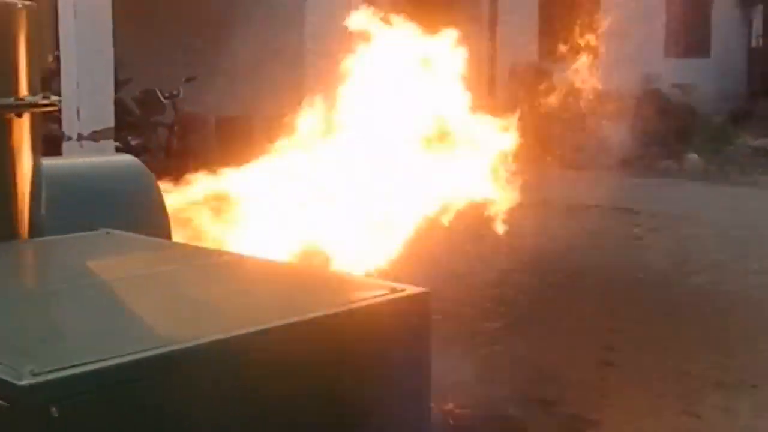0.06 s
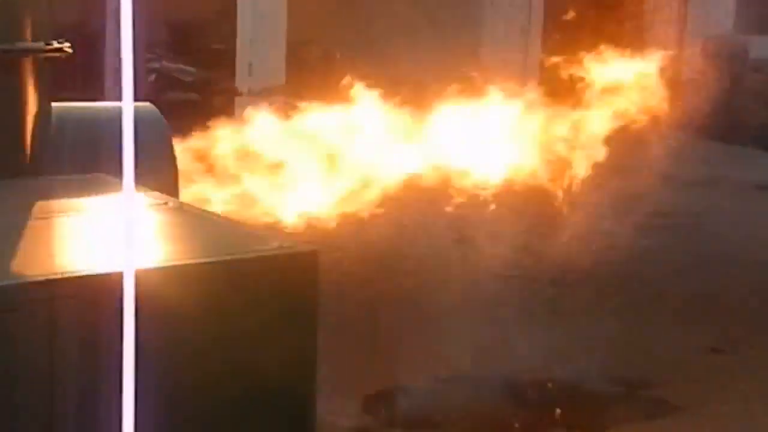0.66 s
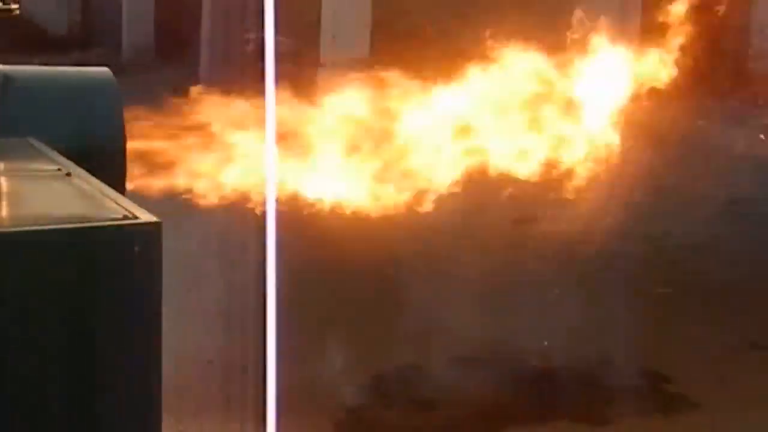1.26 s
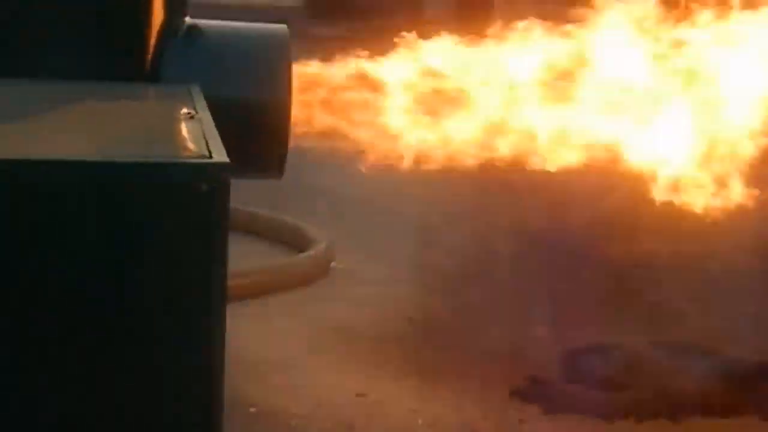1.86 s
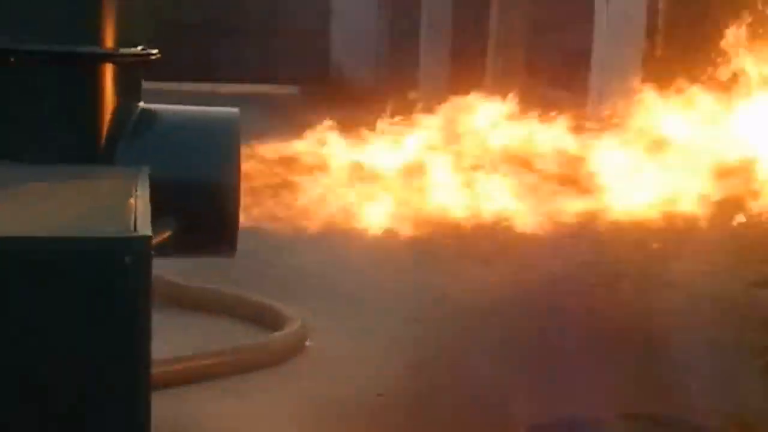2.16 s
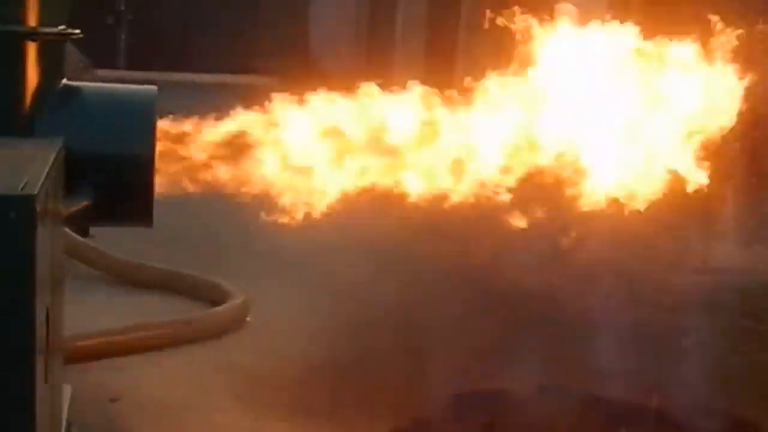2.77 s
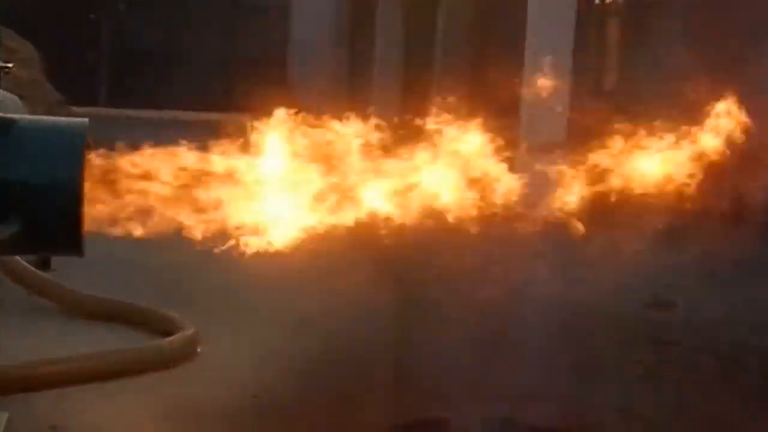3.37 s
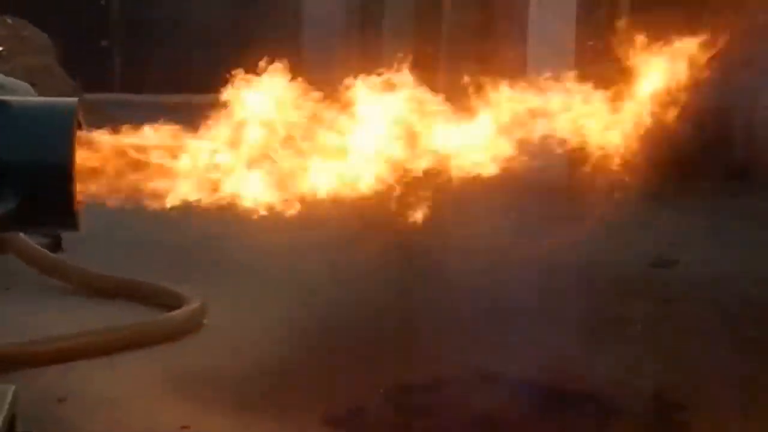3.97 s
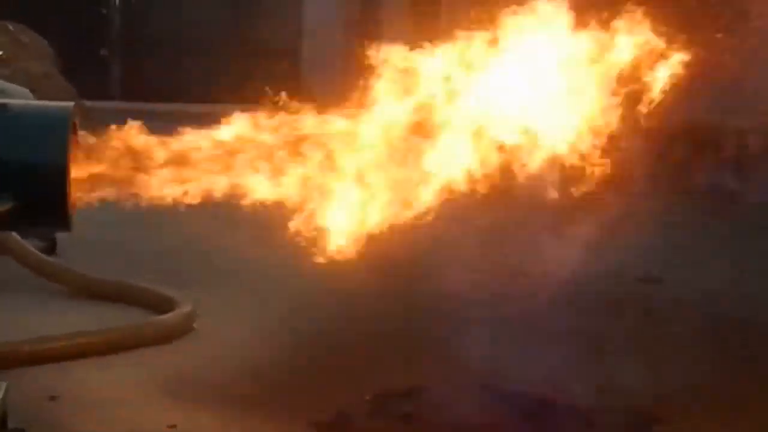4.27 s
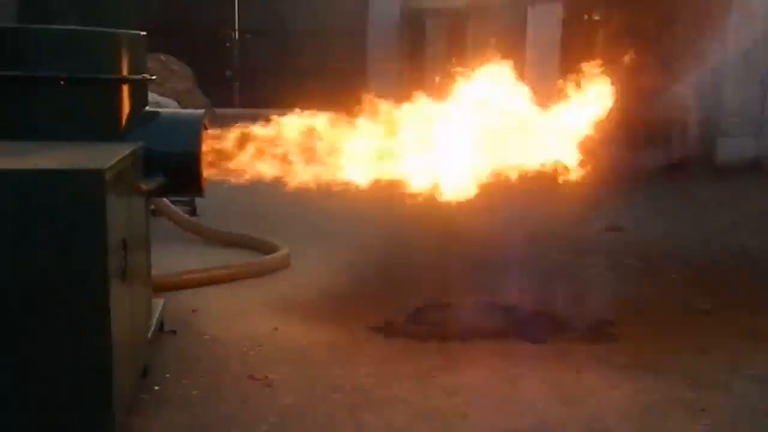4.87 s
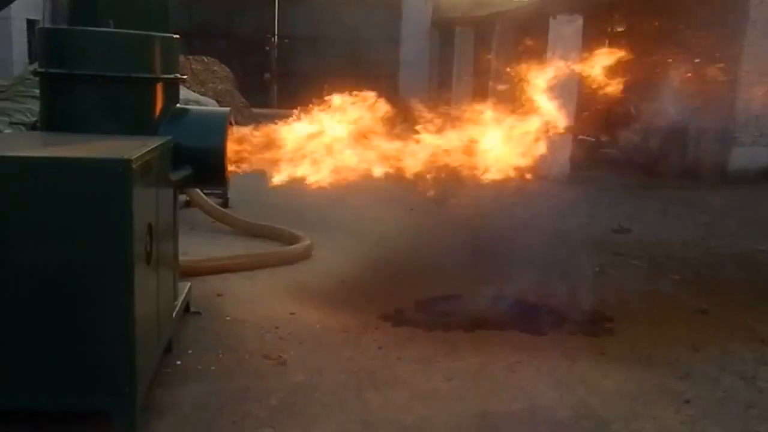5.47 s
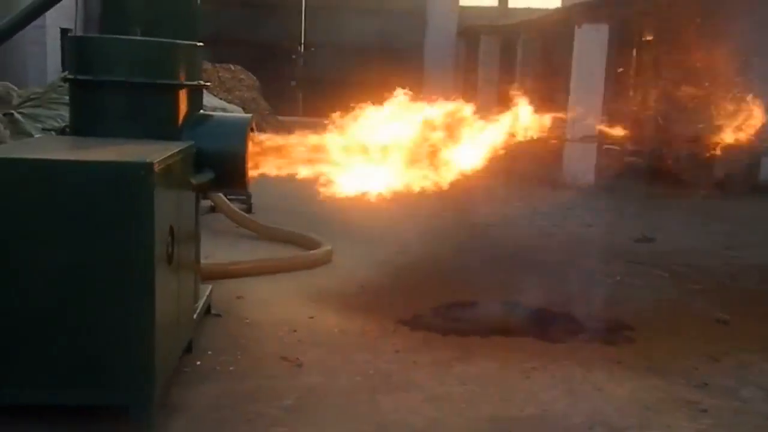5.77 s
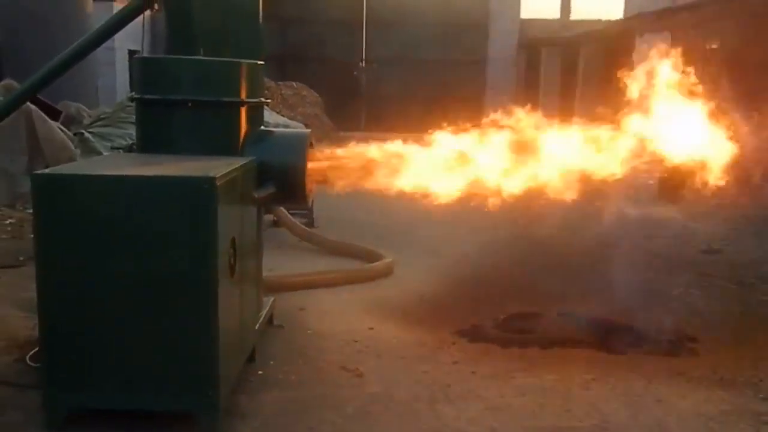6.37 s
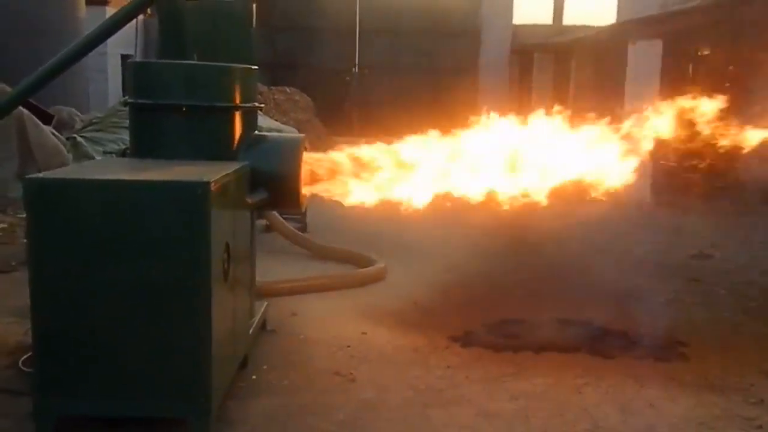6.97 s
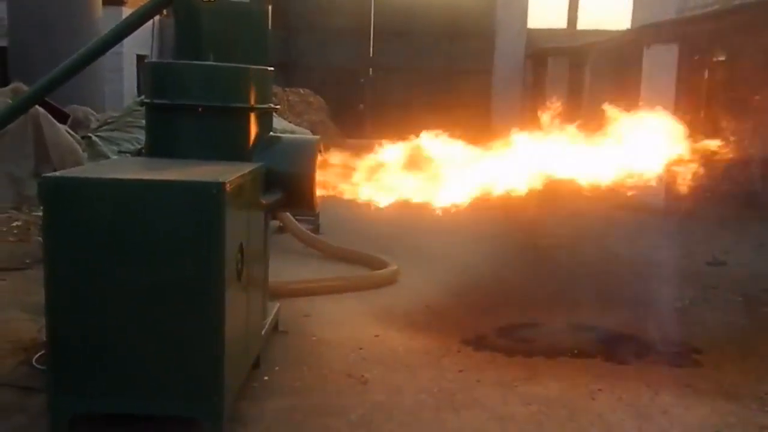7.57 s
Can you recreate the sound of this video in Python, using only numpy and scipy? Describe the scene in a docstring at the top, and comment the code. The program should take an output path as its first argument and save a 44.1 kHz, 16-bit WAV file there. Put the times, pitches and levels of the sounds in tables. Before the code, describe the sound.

Deep turbulent flame roar from a blown burner, flaring and thumping over a fan's hum, with a short muffled spell and sharp clicks.

```python
"""A large blown burner throws a flame across a workshop yard: deep rumble, turbulent roar, hiss, blower hum.
From the first second it spits, flares and thumps; loud thumps duck the camera's gain, which creeps back.
The camera walks round the burner, so the comb filter of the ground reflection slides upward.
At 4.5 s a finger knocks the microphone and covers it, muffling the burner until it slips off at 5.3 s.
Then the camera backs away: the hiss fades, and sharp overload clicks mark many of the thumps."""
import sys
import numpy as np
from scipy.fft import rfft, irfft, next_fast_len
from scipy.io import wavfile
from scipy.ndimage import uniform_filter1d, minimum_filter1d, map_coordinates

SR = 44100
rng = np.random.default_rng(int(sys.argv[2]) if len(sys.argv) > 2 else 0)


def to_wav(s):
    """Save 16-bit WAV."""
    ch = np.atleast_2d(s).T  # columns
    pcm = np.round(np.clip(ch, -1, 1) * 32767)  # PCM
    wavfile.write(sys.argv[1], SR, pcm.astype(np.int16))


N = 336042


# strength of the fire: t/s, rumble gain/dB, roar gain/dB
FIRE_STRENGTH = [(.35, 1, -2.7), (.6, 2.3, 0.2), (.85, 2.7, -0.7), (1.03, -3.2, -2.8), (1.3, 1, 0.3),
                 (1.48, 0.8, 2), (1.7, 2, 2), (2.7, -0.5, 1), (3.15, 1, 1.2), (3.6, 0.7, 1), (4.4, 1, 2.7),
                 (5.4, -1, -1.7), (6.7, 0, -3.1), (7.6, 2.8, -2.4)]
def flame():
    """Turbulent combustion: the same random puffs modulate the drone, the roar and the air jet."""
    rumble_db, fire_db = curves(FIRE_STRENGTH)
    lag_ms, far, beside = camera_path()
    puffs, sizzle = wobble(rate=70), wobble(rate=870)
    flare_db, thumps = flares()
    surge_db = surges()
    drone_db = 0.588 * fire_db + 0.96 * flare_db + 0.75 * surge_db - 2.56 * far
    roar_db = fire_db + 0.85 * flare_db + surge_db
    fire = thumps + plume_rumble(far, lag_ms) * amp(rumble_db - 10)
    fire += tube_drone(puffs, far, lag_ms) * amp(drone_db - 12.9)
    fire += eddy_roar(puffs, beside, lag_ms) * amp(roar_db - 20.5)
    return fire + air_jet(puffs, sizzle, 0.5 * (flare_db + surge_db), lag_ms)


# rumble spectra, near and far: f/Hz, level/dB
PLUME_NEAR = [(12, -7), (25, -5), (67, 4.5), (105, -3), (160, -1.8), (205, -7.5), (300, -20), (600, -79)]
PLUME_FAR = [(12, -5.5), (25, -4.5), (60, 0.5), (100, 1.5), (155, -1.5), (205, -2.5), (300, -21.5),
             (600, -81)]
def plume_rumble(far, lag_ms):
    """Unsteady heat release: the whole plume radiates low noise, its swing softly limited."""
    plume = over_ground(blend(PLUME_NEAR, PLUME_FAR, far ** 2), lag_ms, bounce=0.341)
    return unit(np.tanh(plume / 2.1))


# drone spectra, near and far: f/Hz, level/dB
TUBE_NEAR = [(150, -5), (240, 3), (305, 6.3), (405, 4.8), (520, -6.5), (800, -48.5)]
TUBE_FAR = [(150, -13), (205, 4.5), (280, 5.3), (420, 8.5), (530, 0), (680, -1.5), (900, -38.5)]
def tube_drone(puffs, far, lag_ms):
    """Air-column resonance: the burner tube drones, higher in pitch towards the far side."""
    return over_ground(blend(TUBE_NEAR, TUBE_FAR, far) * amp(1.12 * puffs), lag_ms, bounce=0.33)


# roar spectra, behind the burner and beside the flame: f/Hz, level/dB
EDDIES_BEHIND = [(300, -15), (620, 5.5), (780, 3), (1100, -3.5), (1450, -9), (1900, -11.5), (3500, -28.5),
                 (6000, -48.5)]
EDDIES_BESIDE = [(300, -16), (600, 0.5), (850, 1.5), (1150, -2.5), (1900, -5.5), (2400, -18), (3500, -20),
                 (6000, -47.5)]
def eddy_roar(puffs, beside, lag_ms):
    """Directivity: burning eddies sound brighter from the side than from behind."""
    eddies = blend(EDDIES_BEHIND, EDDIES_BESIDE, beside) * amp(0.834 * puffs)
    return over_ground(eddies, lag_ms, bounce=0.25)


# ends of flares: t/s, thump level/dB, swell/dB
FLARE_ENDS = [(0.446, 3, 4), (.648, 9, -1), (.975, 4.5, 4), (1.131, 5, 1.5), (1.572, 9, 1.5), (1.97, 4, 2),
              (2.302, 4.5, 3.5), (2.545, 3.5, 2), (2.705, 6.5, -0.5), (2.985, 4.5, 5), (3.128, 8, 3),
              (3.463, 7, 5), (3.937, 4.5, 3), (4.391, 6.5, -2), (5.41, 5, 1), (5.61, 2, 1),
              (5.81, 6.5, -0.5), (6.131, 4.5, 5.5), (6.308, 4, 3), (6.742, 5.5, 4), (6.992, 7, 2.5),
              (7.365, 7, 3), (7.564, 10.5, -3.5)]
def flares(rise_s=0.0564, fall_s=0.0076, thump_s=0.00283):
    """Monopole radiation: a swell (in dB) ends abruptly and sends out one low pressure pulse."""
    t, swell_db, thumps = np.arange(-SR // 3, SR // 3) / SR, np.zeros(N), np.zeros(N)
    swell = np.exp(-(t / np.where(t < 0, rise_s, fall_s)) ** 2)
    u = (t / thump_s) ** 2
    pulse = (1 - u) / (1 + u) ** 2
    for s, thump_db, rise_db in FLARE_ENDS:
        add(swell_db, s + t[0], rise_db * swell)
        add(thumps, s + t[0], -amp(thump_db) * pulse)
    return swell_db, thumps


# surges without a thump: t/s, half length/s, swell/dB
FUEL_POCKETS = [(0.405, .035, 2), (0.88, 0.042, 2.5), (1.385, 0.044, 4), (1.877, 0.089, 2.5),
                (2.135, .04, 2), (2.4, .04, 0.5), (2.66, 0.0237, 4.5), (3.654, 0.037, 3), (3.846, 0.03, 3),
                (4.136, 0.048, 2), (5.567, 0.029, 1), (5.694, 0.02, 2.5), (5.925, 0.025, 4),
                (6.262, 0.0254, 3.5), (6.688, 0.024, 4), (6.912, 0.035, 3)]
def surges():
    """Amplitude modulation: a Gaussian swell in dB as each larger pocket of fuel burns."""
    return sum(db * np.exp(-((clock() - s) / half) ** 2) for s, half, db in FUEL_POCKETS)


# air jet, loudest near the nozzle: t/s, rush level/dB, hiss level/dB
JET_LEVELS = [(0, -29, -26.7), (.42, -27.6, -27.2), (.65, -28.7, -36.3), (1.3, -27.2, -36.2),
              (2, -28.3, -41.8), (3, -29, -42.9), (4.4, -27.5, -37.8), (5.6, -33.6, -48),
              (6.6, -38.2, -52.3), (7.6, -42, -61.5)]
# rush and hiss spectra: f/Hz, level/dB
RUSH_SPECTRUM = [(800, -4.5), (1800, 2.5), (2600, 2), (3400, 0), (4500, -4), (6000, -8), (8000, -19)]
HISS_SPECTRUM = [(1500, -19.5), (3500, 6.5), (5000, -7), (7000, 3), (11000, -1.5), (17000, -0.5)]
def air_jet(puffs, sizzle, swell_db, lag_ms):
    """Turbulent mixing: the jet radiates a broadband rush and a flickering hiss."""
    rush_db, hiss_db = curves(JET_LEVELS)
    rush = over_ground(noise(RUSH_SPECTRUM) * amp(0.44 * puffs), lag_ms, bounce=0.082)
    hiss = unit(noise(HISS_SPECTRUM) * amp(0.86 * puffs + 0.65 * sizzle))
    return rush * amp(rush_db + swell_db) + hiss * amp(hiss_db)


# spitting fuel: t/s, level/dB, centre f/Hz, T60/s
FUEL_SPITS = [(0.0421, -27, 11000, .14), (0.209, -25, 6500, .07), (0.4314, -26, 11000, .075),
              (0.9402, -32, 11000, .065), (2.805, -36, 12000, .06), (6.368, -31, 11000, 0.062),
              (7.257, -34, 4500, 0.153)]
def spits(half_band_octaves=0.98):
    """Exponential decay: each bit of fuel fizzes briefly in its own band of noise."""
    t, out = np.arange(SR // 4) / SR, np.zeros(N)
    hz = np.fft.rfftfreq(len(t), 1 / SR)
    for s, db, centre_hz, t60 in FUEL_SPITS:
        band = 1 / (1 + (np.log2((hz + 1) / centre_hz) / half_band_octaves) ** 2)
        fizz = unit(irfft(rfft(rng.standard_normal(len(t))) * band, len(t)))
        add(out, s, amp(db - 60 * t / t60) * fizz)
    return out


# blower tones: t/s, hum level/dB, overtone level/dB, whine level/dB
BLOWER_LEVELS = [(0, -33, -44.5, -33), (.35, -31, -47.5, -30.5), (.7, -19, -46.5, -29),
                 (1.1, -29, -40.5, -35.5), (1.45, -22.5, -29.5, -37), (2.1, -19.5, -38.5, -37.5),
                 (2.9, -22, -38, -49.5), (3.4, -27, -41, -46), (4.3, -23, -40, -39),
                 (5.9, -27, -39.5, -50.5), (6.6, -27.5, -39.5, -45.5), (7.6, -27, -39, -36)]
def blower(blade_hz=296.3, whine_hz=1089):
    """Scintillation: blade-passing harmonics and a motor whine flutter as they cross the hot air."""
    hum_db, overtone_db, whine_db = curves(BLOWER_LEVELS)
    speed = 1 + 0.001426 * wobble(rate=7)
    turn = 2 * np.pi * np.cumsum(speed) / SR
    tone = lambda hz: unit(np.sin(hz * turn + 0.25 * wobble(rate=35)) * amp(1.7 * wobble(rate=14)))
    hum = tone(2 * blade_hz) + amp(-9.5) * tone(blade_hz)
    return amp(hum_db) * hum + amp(overtone_db) * tone(4 * blade_hz) + amp(whine_db) * tone(whine_hz)


# sharp overload clicks on loud peaks, mostly at thumps: t/s, level/dB
OVERLOAD_CLICKS = [(3.4616, -5), (5.4083, 0), (5.61, -11.5), (6.1317, -7), (6.3086, -5), (6.6003, -8),
                   (6.7413, -5), (6.9928, -3.5), (7.3414, -8.5), (7.5627, -5)]
def overload_clicks(half_width_s=0.000101):
    """Broadband impulses: one pointed spike at each listed time gives the click of an overload."""
    t, out = np.arange(SR // 4) / SR, np.zeros(N)
    spike = np.exp(-np.abs(t - t.mean()) / half_width_s)
    for s, db in OVERLOAD_CLICKS:
        add(out, s - t.mean(), amp(db) * spike)
    return out


# modes of the camera case: f/Hz, level/dB, T60/s
CASE_MODES = [(856, -3, 0.0203), (1540, -3.5, 0.0099), (2390, 1.5, 0.0092), (3380, -11.5, 0.0044),
              (4940, -20, 0.0084), (9560, -13.5, 0.0065)]
def knock(at_s=4.4866, slap_s=0.000158, crack_t60=0.011):
    """Impact excitation: the finger's slap and crack set the case ringing in damped modes."""
    t, out = np.arange(SR // 4) / SR, np.zeros(N)
    ring = sum((-1) ** k * amp(db - 60 * t / t60) * np.sin(2 * np.pi * hz * t)
               for k, (hz, db, t60) in enumerate(CASE_MODES))
    crack = amp(-17.5 - 60 * t / crack_t60) * rng.standard_normal(len(t))
    u = t / slap_s - 2
    slap = -amp(14) * u * np.exp(-u ** 2)
    add(out, at_s, slap + crack)
    add(out, at_s + 2 * slap_s, ring)
    return out


# soft bumps and faint ticks on the case: t/s, level/dB
FINGER_BUMPS = [(4.696, -5.5), (4.751, -4.5), (4.923, -6), (4.994, -6.5), (5.025, -3.5)]
FINGER_TICKS = [(4.6995, -54), (5.194, -42.5)]
def handling(bump_hz=67.3, bump_t60=0.0674, tick_t60=0.04):
    """Structure-borne sound: the case thuds and ticks as the finger shifts and lets go."""
    t, bumps, tick_level = np.arange(SR // 4) / SR, np.zeros(N), np.zeros(N)
    thud = np.sin(2 * np.pi * bump_hz * t) * (1 - np.exp(-t / 0.00061))
    for s, db in FINGER_BUMPS:
        add(bumps, s, amp(db - 60 * t / bump_t60) * thud)
    for s, db in FINGER_TICKS:
        add(tick_level, s, amp(db - 60 * t / tick_t60))
    return bumps + tick_level * rng.standard_normal(N)


# paths past the finger, end rows held before and after: t/s, leak gain/dB, bass gain/dB (capped at 0)
FINGER_SEAL = [(4.486, -4.5, -1.5), (4.498, -20, -2.5), (4.55, -32, -11), (4.85, -31, -12), (5, -26, -4.5),
               (5.12, -20.5, -5.5), (5.21, -17, -1.5), (5.268, -1.5, 7.5)]
# hollow-sounding peaks in the muffled sound that leaks past: f/Hz, half width/Hz, level/dB
HOLLOW_PEAKS = [(567, 188, -6.5), (1019, 94, -6.5), (1521, 122, -7), (2552, 141, 0), (3270, 126, -17),
                (10810, 4150, -1.5)]
def covered(x, corner_hz=172, floor_db=-12):
    """Low-pass transmission: bass crosses the finger; the rest leaks past, faint and hollow."""
    leak_db, bass_db = np.minimum(curves(FINGER_SEAL), 0)
    bass = filtered(x, lambda hz: 1 / (1 + (hz / corner_hz) ** 3))
    peaks = lambda f: sum(amp(db) / (1 + ((f - hz) / width) ** 2) for hz, width, db in HOLLOW_PEAKS)
    hollow = filtered(x - bass, lambda f: amp(floor_db) + peaks(f))
    leak = amp(leak_db)
    return amp(bass_db) * bass + leak * (leak * (x - bass) + (1 - leak) * hollow)


# the camera's walk: t/s, reflection lag/ms, far share (0-1), beside share (0-1)
WALK = [(0, 2.762, 0.15, 0.29), (1.4, 2.449, 0.05, 0.6), (3, 2.234, 0.67, 0.94), (4.4, 2.106, 0.98, 0.93),
        (5.4, 1.912, 0.97, 0.52), (7.6, 1.781, 1, 0.08)]
def camera_path():
    """Moving receiver: position sets the reflection's lag and the blend of spectra."""
    lag_ms, *shares = curves(WALK)
    far, beside = np.clip(shares, 0, 1)
    return lag_ms, far, beside


def over_ground(x, lag_ms, bounce):
    """Interference: direct sound and its reflection off the concrete form a moving comb; rms 1."""
    late = np.interp(clock() - lag_ms / 1000, clock(), x)
    return unit(x + bounce * late)


def gain_control(x, ceiling_db, release_s):
    """Compression: a millisecond peak over the ceiling cuts the gain at once; it recovers slowly."""
    level = np.abs(uniform_filter1d(np.abs(x), size=SR // 700))
    needed_db = np.minimum(ceiling_db - 20 * np.log10(level + 1e-9), 0)
    fade = np.exp(-clock() / release_s)
    held_db = np.minimum.accumulate(minimum_filter1d(needed_db, size=SR // 200) / fade) * fade
    return x * amp(uniform_filter1d(held_db, size=SR // 200))


def amp(db):
    """Decibels to amplitude ratio."""
    return 10 ** (np.asarray(db) / 20)


def unit(x):
    """Normalisation to rms 1."""
    return x / np.sqrt(np.mean(x ** 2) + 1e-20)


def clock():
    """Sample times in seconds."""
    return np.arange(N) / SR


def curves(rows):
    """Linear interpolation in time of each column after the first."""
    s, *cols = np.transpose(rows)
    return [np.interp(clock(), s, c) for c in cols]


def wobble(rate):
    """Spline interpolation of random knots, rate of them a second."""
    return map_coordinates(rng.standard_normal(int(N * rate / SR) + 4), [clock() * rate])


def filtered(x, response):
    """Linear filtering: the spectrum of x times a frequency response."""
    m = next_fast_len(N + SR // 2)
    return irfft(rfft(x, m) * response(np.fft.rfftfreq(m, 1 / SR)), m)[:N]


def noise(spectrum):
    """Spectral shaping of white noise by (f/Hz, level/dB) points; rms 1."""
    f, db = np.transpose(spectrum)
    colour = lambda hz: amp(np.interp(np.log(hz + 1), np.log(f), db))
    return unit(filtered(rng.standard_normal(N), colour))


def blend(first, second, share):
    """Incoherent addition: noises of two spectra crossfade at constant power."""
    return np.sqrt(1 - share) * noise(first) + np.sqrt(share) * noise(second)


def add(track, s, sound):
    """Superposition of a short sound at time s."""
    part = track[round(s * SR):][:len(sound)]
    part += sound[:len(part)]


def scene():
    """Superposition at the microphone; the finger muffles only flame and blower."""
    burner = covered(flame() + blower())
    return (burner + spits() + overload_clicks() + knock() + handling())[None]


def record(dry, notch_hz=7900, half_width_hz=300, top_hz=17300):
    """The camera's signal chain: treble notch, gain control, soft saturation and band limit."""
    x = filtered(dry[0], lambda hz: 1 - 0.64 / (1 + ((hz - notch_hz) / half_width_hz) ** 2))
    x = gain_control(x, ceiling_db=1.1, release_s=0.287)
    x = x / (1 + np.abs(x) ** 8) ** (1 / 8)
    return filtered(x, lambda hz: hz < top_hz)[None]


dry = scene()
out = record(dry)
to_wav(out)
```